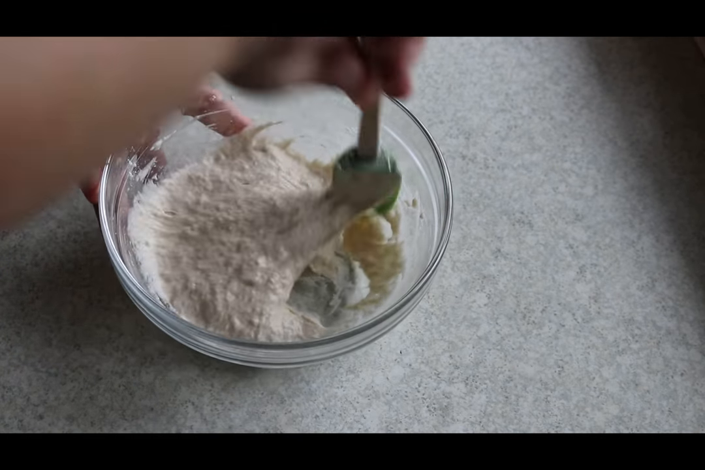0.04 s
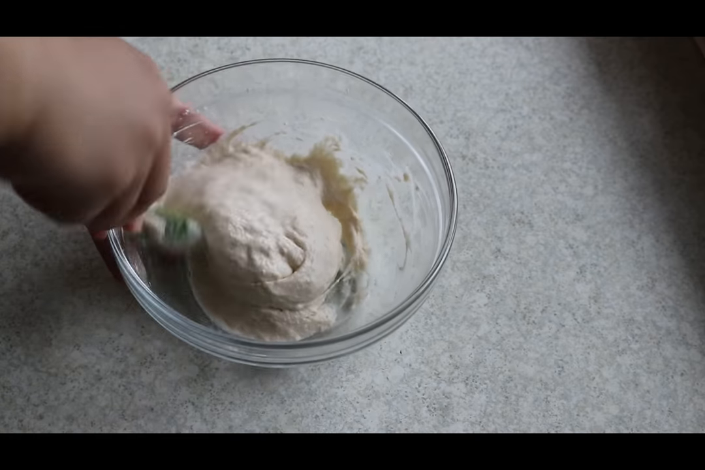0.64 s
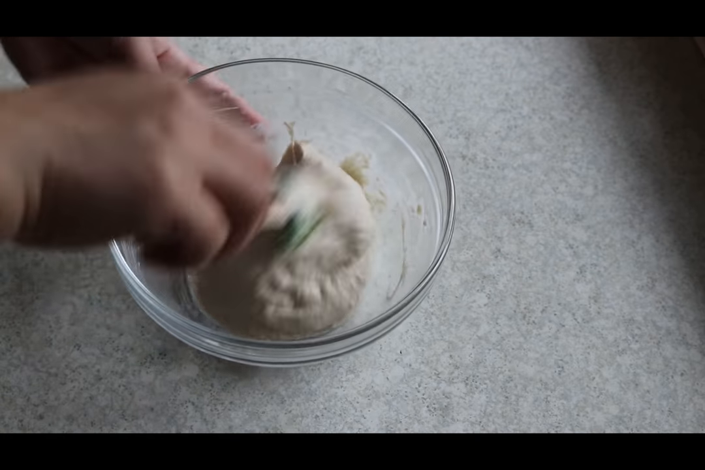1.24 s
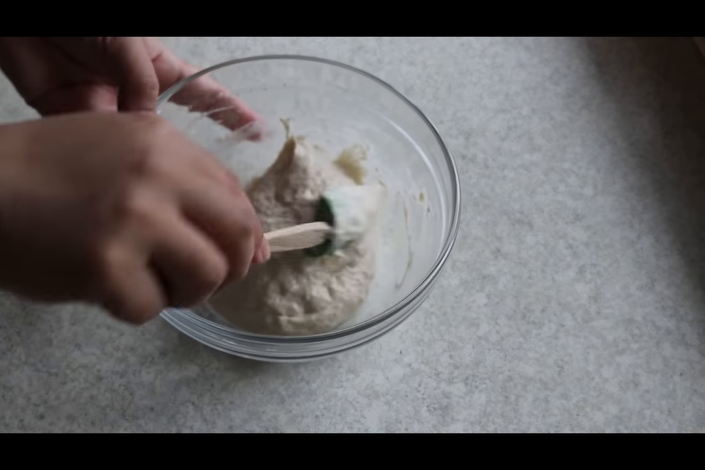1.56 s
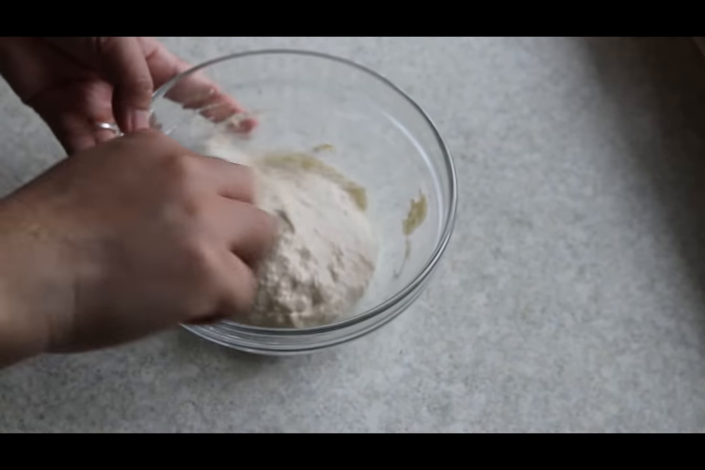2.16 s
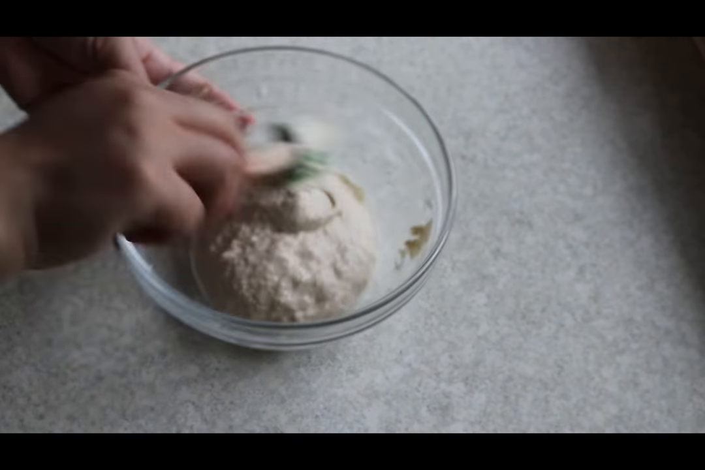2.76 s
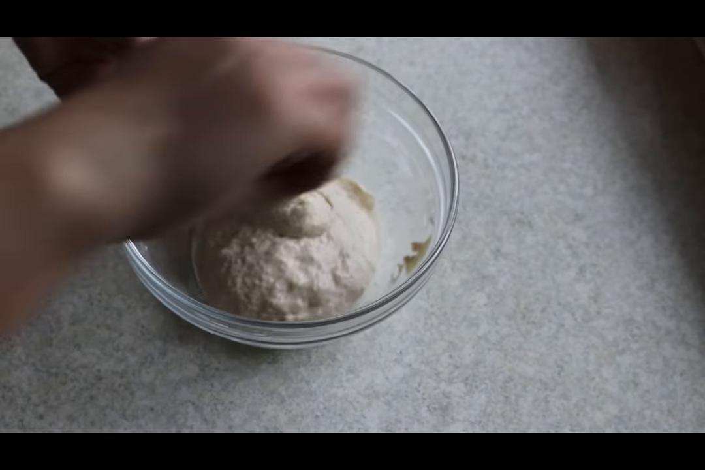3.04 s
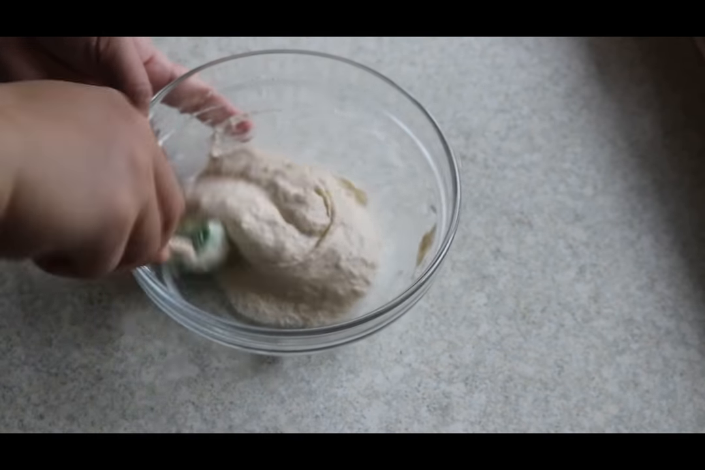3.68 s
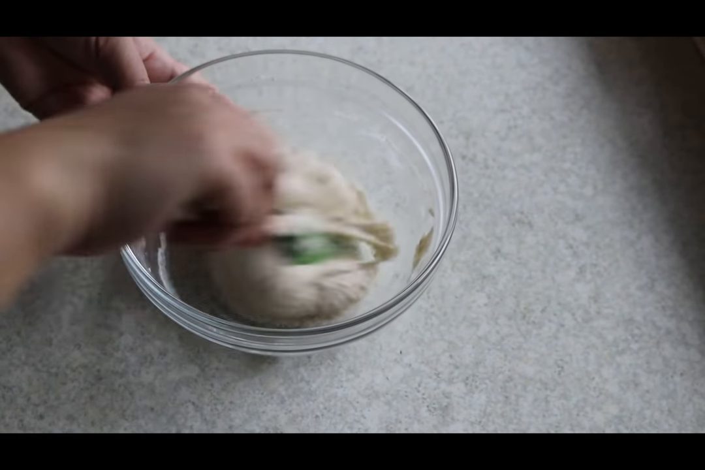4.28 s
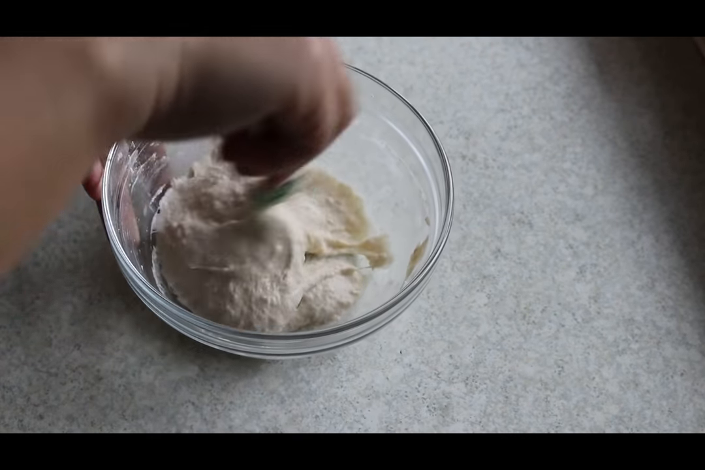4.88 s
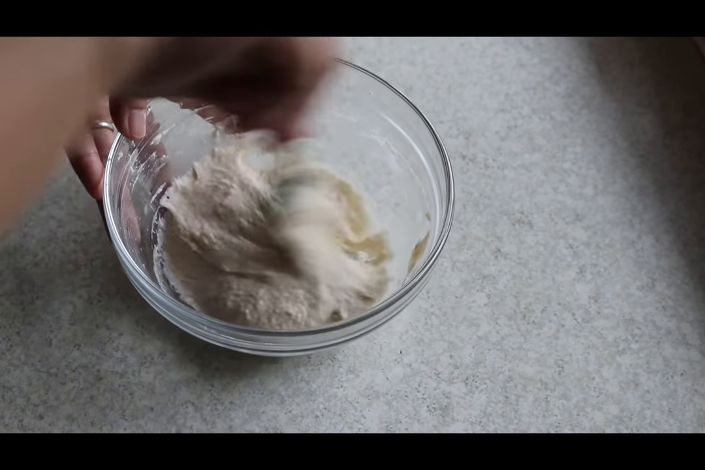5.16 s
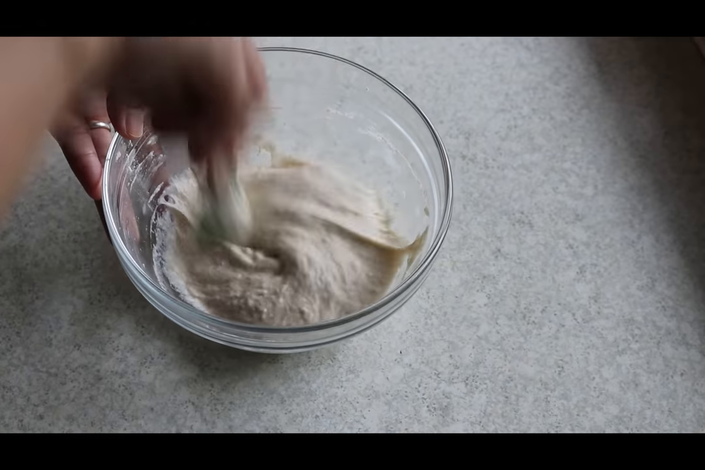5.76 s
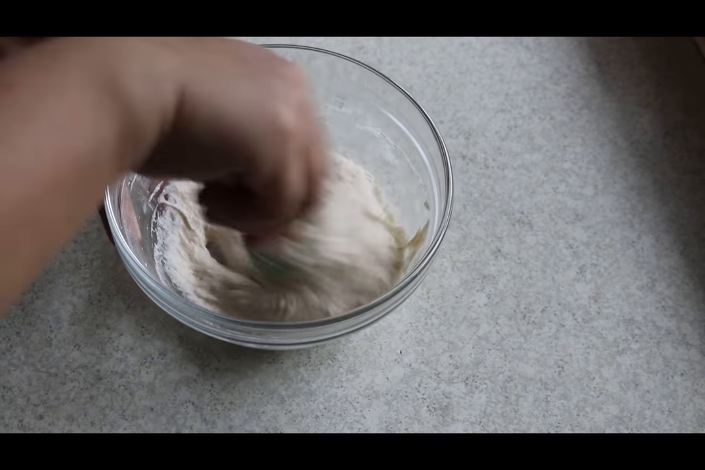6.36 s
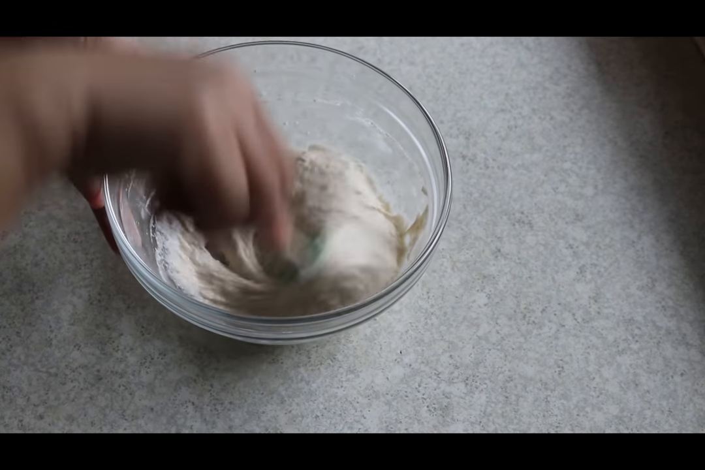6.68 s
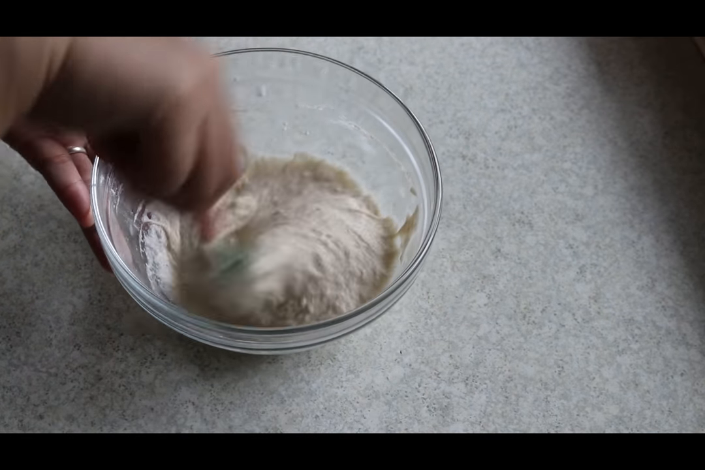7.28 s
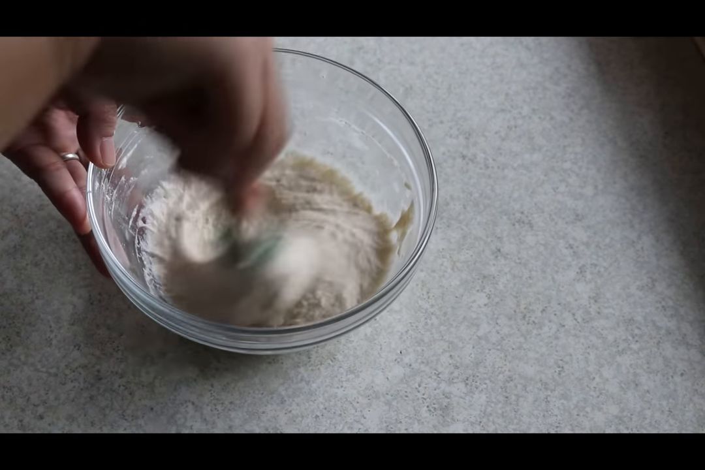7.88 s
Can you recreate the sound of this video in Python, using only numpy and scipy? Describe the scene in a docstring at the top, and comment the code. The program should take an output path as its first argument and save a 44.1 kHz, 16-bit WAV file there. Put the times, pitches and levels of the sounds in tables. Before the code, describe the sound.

Close to a stereo microphone in a bare kitchen, sticky batter is worked around a glass bowl with a rubbery spatula. Quiet, irregular scrapes mix with fine wet crackles as the batter peels away. Two dull knocks of the bowl on the counter stand out in the first half, with another cluster later, before more rubbing and small pops. A faint hush lies underneath.

```python
"""A silicone spatula folds thick batter in a glass bowl on a kitchen counter, near a stereo microphone.
Stick-slip friction on the glass makes a soft rub; the batter tears off in tiny sticky clicks and its
air pockets snap. Now and then the stiff mass tips the bowl, which drops back with a dull knock as
the impact excites its damped modes. The bare kitchen reverberates for half a second over a faint hush."""
import sys
import numpy as np
from scipy import signal
from scipy.fft import rfft, irfft, next_fast_len
from scipy.io import wavfile

SR = 44100
rng = np.random.default_rng(int(sys.argv[2]) if len(sys.argv) > 2 else 0)


def log_audio(samples):
    """Write samples as a 16-bit WAV file to the path given in sys.argv[1]."""
    # one column per channel
    frames = np.atleast_2d(samples).T
    # limit to full scale, then quantise
    limited = np.clip(frames, -1, 1)
    pcm = np.round(limited * 32767).astype(np.int16)
    wavfile.write(sys.argv[1], SR, pcm)


N = 353682
T = np.arange(N) / SR
PAD = next_fast_len(N + SR)
HZ = np.maximum(np.arange(PAD // 2 + 1) * SR / PAD, 1)


def undb(db):
    """Amplitude ratio of a level in decibels."""
    return 10 ** (np.asarray(db) / 20)


def unit(x):
    """Normalisation to rms 1."""
    return x / np.sqrt(np.mean(x ** 2))


def colour(x, points):
    """Minimum-phase filtering through (frequency_hz, level_db) points."""
    hz, db = np.transpose(points)
    gain = undb(np.interp(np.log(HZ), np.log(hz), db))
    cepstrum = irfft(np.log(gain), PAD)
    cepstrum[1:PAD // 2] *= 2  # folding the cepstrum makes the filter causal
    cepstrum[PAD // 2 + 1:] = 0
    return irfft(rfft(x, PAD) * np.exp(rfft(cepstrum)), PAD)[..., :x.shape[-1]]


def butter(x, hz, kind, order=2):
    """Maximally flat low-, high- or band-pass filtering."""
    return signal.sosfilt(signal.butter(order, np.minimum(hz, SR / 2 - 1), kind, fs=SR, output="sos"), x)


def fade(t, t60):
    """Exponential decay, 60 dB down after t60 seconds."""
    return np.exp(-np.log(1000) * t / t60)


def add(out, start_s, x):
    """Superposition of x on out from start_s on."""
    i = int(start_s * SR)
    out[i:i + len(x)] += x[:N - i]


def clicks(per_s, spread_db):
    """Shot noise: random impulses of uneven size, rms 1."""
    sizes = undb(spread_db * np.minimum(rng.exponential(size=N), 4))
    return unit((rng.random(N) < per_s / SR) * sizes * rng.choice([-1, 1], N))


def effort(moves, attack_s, release_s, rest_db):
    """Incoherent summation: an envelope of moves that build, hold and die away over a steady floor."""
    power = np.full(N, undb(rest_db) ** 2)
    for start_s, length_s, level_db in moves:
        rise = np.clip((T - start_s) / attack_s, 0, 1)
        fall = np.exp(-np.clip((T - start_s - length_s) / release_s, 0, 20))
        power += (undb(level_db) * rise * fall) ** 2
    return np.sqrt(power)


def ports(x, lag_s, left_db, shade_hz):
    """Path difference and shadowing: a source on the right reaches the left port later, softer, duller."""
    shade = undb(left_db) / np.sqrt(1 + (HZ / shade_hz) ** 2)
    left = irfft(rfft(x, PAD) * shade * np.exp(-2j * np.pi * HZ * lag_s), PAD)[:N]
    return np.array([left, x])


def diffuse_noise(spacing_m=0.16):
    """Diffuse-field coherence: noise at two ports is alike in the bass, unrelated in the treble."""
    coherence = np.sinc(2 * HZ * spacing_m / 343)
    mid, side = (irfft(rfft(rng.standard_normal(N), PAD) * np.sqrt((1 + sign * coherence) / 2), PAD)[:N]
                 for sign in (1, -1))
    return np.array([mid + side, mid - side])


def hush(level_db=-55):
    """Noise floor: the still room and the even hiss of the microphone."""
    # background spectrum: frequency_hz, level_db
    spectrum = [(15, -16), (27, -2), (45, -2.5), (65, 1.5), (110, -9.5), (300, -7.5), (600, -11),
                (1000, -14), (3000, -19), (5000, -25.5), (7000, -20.5), (10000, -21), (16000, -30)]
    return undb(level_db) * unit(colour(diffuse_noise(), spectrum))


def kitchen(x, t60_low_s=0.47, t60_high_s=0.21, split_hz=3000, build_s=0.00079):
    """Reverberation: hard walls return a diffuse tail and a few low standing waves."""
    # spectrum of the tail: frequency_hz, level_db
    spectrum = [(60, -5.5), (200, -7.5), (450, -4), (700, -7), (1000, -2.5), (2000, -3), (3500, -2),
                (8000, -7), (16000, -2.5)]
    # standing waves: pitch_hz, t60_s, level_db, left_minus_right_db
    room_modes = [(151.3, 0.34, 9.5, 0), (209, 0.13, -5.5, 24), (256, 0.29, 7.5, 1),
                  (288.6, 0.48, -8, -35.5), (343.6, 0.47, 11.5, -2.5), (398, 0.19, -5.5, 28),
                  (444, 0.32, 0, 11), (477, 0.29, -1, -4), (508.7, 0.31, -8, 17), (593, 0.4, 4, 5.5),
                  (627, 0.43, 4, -3), (704, 0.29, -7.5, 11), (786.4, 0.45, 7, 7), (909, 0.66, 2.5, -9),
                  (1022, 0.6, -0.5, 24.5), (1140, 0.33, 0.5, -6), (1327, 0.4, -15, -9), (1410, 1, -3.5, -1)]
    t = T[:SR]
    noise = diffuse_noise()[:, :SR]
    low = butter(noise, split_hz, "low", order=1)
    build = 1 - np.exp(-(t / build_s) ** 2)
    tail = (low * fade(t, t60_low_s) + (noise - low) * fade(t, t60_high_s)) * build
    tail = colour(tail / np.sqrt(np.sum(tail ** 2) / 2), spectrum)
    waves = 0
    for hz, t60, db, pan_db in room_modes:
        ring = 2 * np.log(1000) / (t60 * SR) * fade(t, t60) * np.cos(2 * np.pi * hz * t)  # gain 1 at hz
        waves = waves + undb(db + np.array([[pan_db], [-pan_db]]) / 2) * ring * build
    return signal.fftconvolve(x[None], tail + waves, axes=1)[:, :N]


def knocks(edge_t60_s=0.02, lowest_hz=85):
    """Impact excitation of the bowl's modes: soft contact is duller, bare glass adds a bright crack."""
    # dull knocks and the low bumps just before or after them:
    # start_s, level_db, contact_cutoff_hz, thump_db, edge_db
    bumps = [(1.9949, 1.5, 2940, -2, -25), (2.7605, -26.5, 450, 18, -50), (2.7768, -30, 1800, -28, -29),
             (2.7786, 1, 3480, 8, -13.5), (2.8040, -4.5, 780, 4.5, -23), (5.1861, -0.5, 2090, -0.5, -22.5),
             (5.4305, -26, 1000, 9.5, -35), (5.7022, -27, 875, 12.5, -37), (5.8165, -15, 597, 6.5, -13.5),
             (5.8400, -24, 350, 6.5, -44), (6.0850, -22, 533, 14, -7), (6.2560, -6.5, 855, -2, -26),
             (6.5135, -29.5, 1000, 12, -27)]
    # modes damped by batter, hand and counter: pitch_hz, t60_s, level_db
    bowl_modes = [(156.7, 0.032, -15), (253, 0.034, -9.5), (428, 0.022, 0.5), (624, 0.018, 0.5),
                  (728.5, 0.029, -4), (1165, 0.0086, 2), (1365, 0.016, -2.5), (1672, 0.016, -6.5),
                  (2440, 0.0013, -4), (3650, 0.011, -25)]
    # spectrum of the glassy crack: frequency_hz, level_db
    spectrum = [(1000, -15), (1800, 2), (6500, -15.5), (8600, -4.5), (16000, -36)]
    bodies, edges, t = np.zeros(N), np.zeros(N), T[:SR // 6]
    cracks = unit(colour(rng.standard_normal(N), spectrum))
    for k, (start_s, level_db, contact_hz, thump_db, edge_db) in enumerate(bumps):
        # each knock rings at slightly different, random pitches
        detune = 1 + .018 * rng.standard_normal(len(bowl_modes))
        modes = [(-1) ** m * undb(db) * fade(t, t60) * np.sin(2 * np.pi * hz * detune[m] * t)
                 for m, (hz, t60, db) in enumerate(bowl_modes)]
        thump = undb(thump_db) * modes[0] + undb(thump_db / 2) * modes[1]
        body = butter(thump + sum(modes[2:]), contact_hz, "low")
        add(bodies, start_s, undb(level_db) * body / np.abs(body).max())
        crack = cracks[k * len(t):(k + 1) * len(t)] * fade(t, edge_t60_s)
        add(edges, start_s, undb(level_db + edge_db) * crack)
    return butter(bodies, lowest_hz, "high"), edges  # so small a body radiates no deep bass


def snaps(crackle_db=-9, scatter_t60_s=0.029, scatter_db=-30):
    """Pressure release: an air pocket ticks, its torn edge crackles and the bowl scatters both."""
    # bursting pockets, big ones reaching lower: start_s, level_db, lowest_hz, crackle_t60_s
    pockets = [(1.8933, -31, 1500, 0.064), (1.915, -32.5, 1500, .068), (2.504, -25.5, 5500, 0.018),
               (2.642, -28, 2490, .007), (3.7841, -9.5, 1220, 0.0021), (4.2797, -17.5, 6540, 0.019),
               (4.3982, -30.5, 4000, .008), (4.7035, -25, 3020, .016), (5.2494, -25, 5000, .006),
               (5.3470, -28.5, 5500, .016), (5.8790, -34, 6000, .025), (6.3235, -30.5, 3520, 0.0049),
               (6.489, -29.5, 3800, 0.016), (6.595, -33.5, 2930, 0.011), (6.689, -27, 6050, 0.03),
               (6.8577, -29, 1490, .007), (6.908, -34.5, 2200, 0.044), (6.9712, -26, 6200, 0.015),
               (7.427, -31, 2060, 0.0049), (7.545, -23, 3800, 0.0098), (7.756, -30.5, 990, .006),
               (7.819, -30, 3900, 0.019)]
    # air channels and bubbles resonating as they close: start_s, pitch_hz, level_db, t60_s
    squeaks = [(5.8770, 10100, -34, 0.078), (6.8570, 1750, -49, 0.029), (7.776, 1610, -33, 0.016)]
    # spectrum of a pop: frequency_hz, level_db
    spectrum = [(900, 3.5), (8500, 4), (16000, -11)]
    out, t = np.zeros(N), T[:SR // 10]
    for start_s, level_db, lowest_hz, t60 in pockets:
        envelope = undb(crackle_db) * fade(t, t60) + undb(scatter_db) * fade(t, scatter_t60_s)
        burst = rng.standard_normal(len(t)) * envelope
        burst[0] = 1  # the tick
        add(out, start_s, undb(level_db) * butter(burst, lowest_hz, "high"))
    for start_s, hz, level_db, t60 in squeaks:
        whistle = unit(butter(rng.standard_normal(len(t)), [hz - 200, hz + 200], "band"))
        add(out, start_s, undb(level_db) * whistle * fade(t, t60) / 2)
    return colour(out, spectrum)


def tearing(threads_per_s=900, spread_db=3.5, gain_db=-2):
    """Rupture under tension: sticky threads and tiny bubbles break, more as the batter parts faster."""
    # batter peeling off blade or bowl: start_s, length_s, level_db
    peels = [(0.14, 0.063, -52.5), (0.25, .50, -59), (1.08, 0.2, -60.5), (1.78, 0.027, -56),
             (1.885, 0.047, -47), (2.025, 0.024, -49), (2.64, 0.046, -51), (2.98, 0.063, -57),
             (3.37, 0.1, -56.5), (3.58, 0.17, -60), (5.585, 0.017, -48), (5.84, 0.035, -53.5),
             (6.145, 0.026, -47), (6.41, 0.32, -57.5), (6.895, 0.031, -47.5), (7.15, .08, -56),
             (7.26, 0.021, -50.5), (7.80, .07, -55)]
    # spectrum of breaking threads: frequency_hz, level_db
    spectrum = [(900, -33), (1800, -2.5), (3800, 0), (5000, -10), (7000, 4), (10200, 1), (14000, -5.5),
                (16000, -28)]
    pace = effort(peels, attack_s=0.0094, release_s=.03, rest_db=-67)
    busy = np.sqrt(pace / pace.mean())
    threads = clicks(threads_per_s * busy, spread_db) / np.sqrt(busy)  # denser at equal power
    return undb(gain_db) * pace * unit(colour(threads, spectrum))


def rubbing(slips_per_s=1800, spread_db=4.0, gain_db=-3):
    """Stick-slip friction: many small slips of batter and blade on the glass blur into a soft rub."""
    # pushes of the spatula: start_s, length_s, level_db
    strokes = [(0.17, 0.15, -51.5), (0.40, .11, -52.5), (0.61, 0.062, -50), (0.74, 0.4, -58),
               (1.03, 0.24, -47.5), (1.47, 0.061, -50), (1.58, 0.17, -55), (1.76, 0.052, -48),
               (1.85, 0.03, -44), (1.95, .13, -45), (2.55, 0.063, -46.5), (2.70, 0.36, -43.5),
               (3.31, 0.13, -49.5), (3.61, 0.17, -49.5), (4.40, 0.022, -52.5), (4.62, 0.058, -50.5),
               (5.01, .09, -62), (6.51, 0.087, -52), (6.975, 0.048, -40.5), (7.15, 0.033, -46.5),
               (7.27, 0.044, -43), (7.55, 0.024, -48.5), (7.65, 0.074, -51), (7.76, 0.11, -50.5)]
    # friction spectrum: frequency_hz, level_db
    spectrum = [(60, -29), (110, -13.5), (160, -3), (210, -6.5), (300, -7), (450, -1.5), (620, 1.5),
                (900, -8), (1350, -6), (2000, -13), (3200, -23.5), (5000, -28.5), (9000, -34)]
    push = effort(strokes, attack_s=0.017, release_s=0.041, rest_db=-60.5)
    return undb(gain_db) * push * unit(colour(clicks(slips_per_s, spread_db), spectrum))


def scene(bounce_s=0.006944, bounce_db=-5, edge_room_db=-4):
    """Direct and reflected sound add: the glass lies to the right, the batter nearer the middle."""
    bodies, edges = knocks()
    glass = bodies + rubbing()
    batter = snaps() + tearing()
    # a duller copy follows about 7 ms later, as the bowl rocks onto the other side of its foot
    bounce = undb(bounce_db) * np.interp(T - bounce_s, T, butter(glass, 1450, "low"), left=0)
    direct = ports(glass + bounce, lag_s=0.00014, left_db=-2.5, shade_hz=5300)
    direct += ports(batter + edges, lag_s=.00002, left_db=-5.0, shade_hz=9900)
    # the open bowl beams its cracks upward, so less of them reaches the walls
    return direct + kitchen(glass + batter + undb(edge_room_db) * edges) + hush()


def record(dry, top_hz=16000):
    """Saturation and band limiting: peaks stop at full scale and a steep low-pass cuts the top."""
    low_pass = signal.ellip(8, .2, 70, top_hz, fs=SR, output="sos")
    return signal.sosfilt(low_pass, np.clip(dry, -1, 1))


dry = scene()
out = record(dry)
log_audio(out)
```